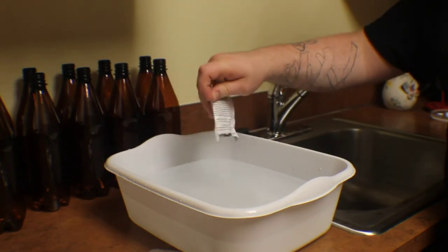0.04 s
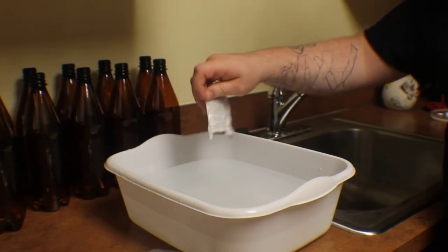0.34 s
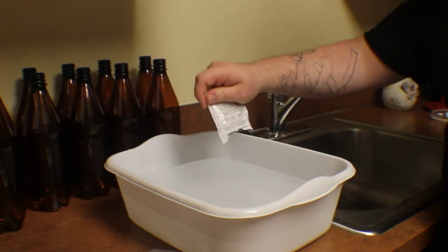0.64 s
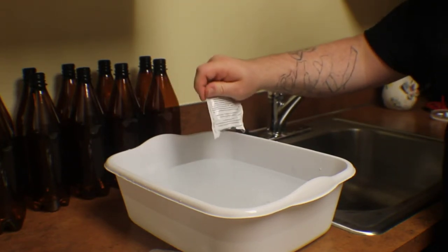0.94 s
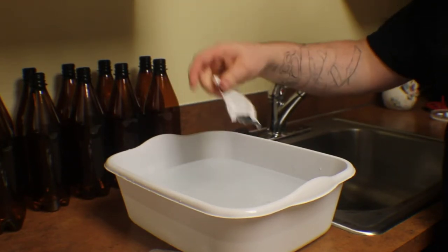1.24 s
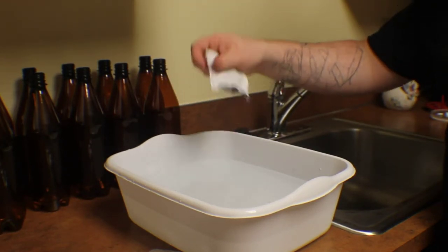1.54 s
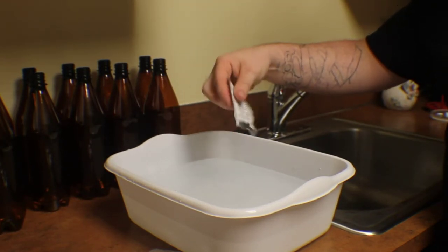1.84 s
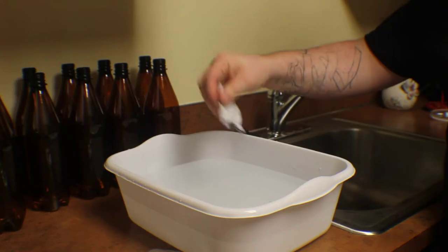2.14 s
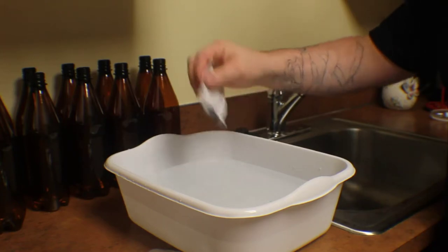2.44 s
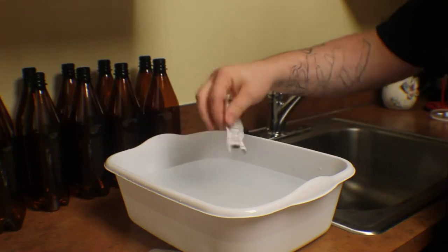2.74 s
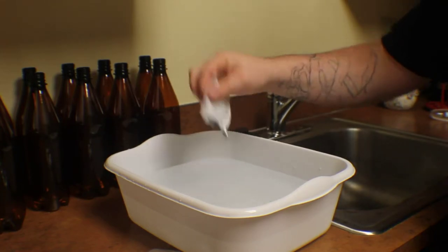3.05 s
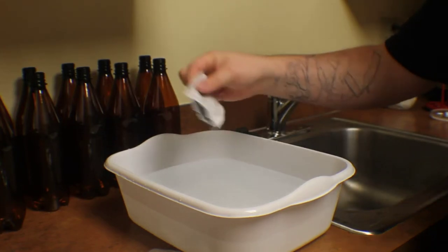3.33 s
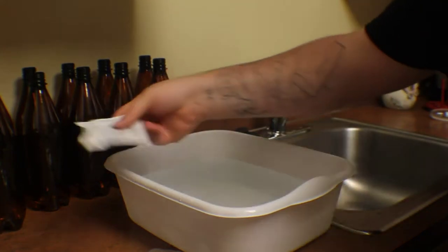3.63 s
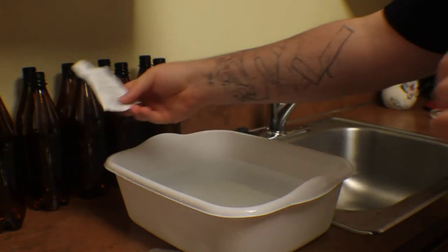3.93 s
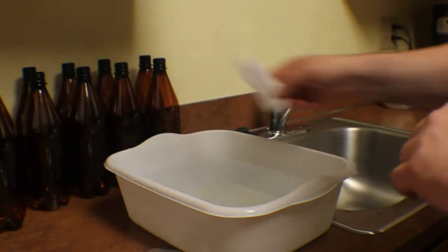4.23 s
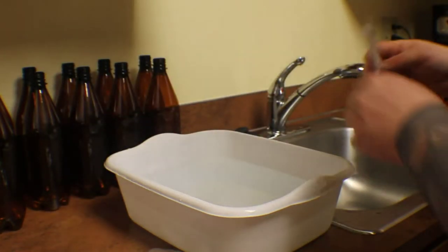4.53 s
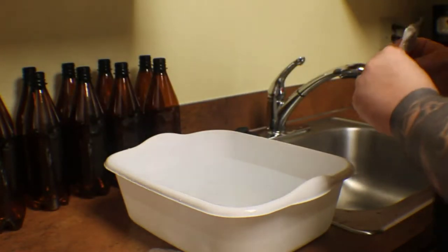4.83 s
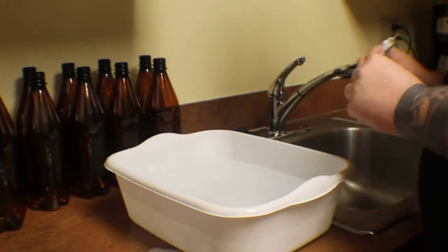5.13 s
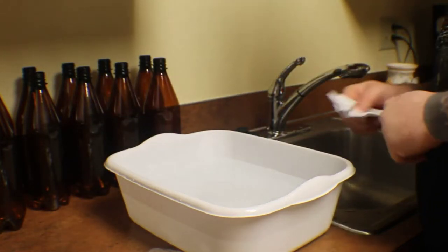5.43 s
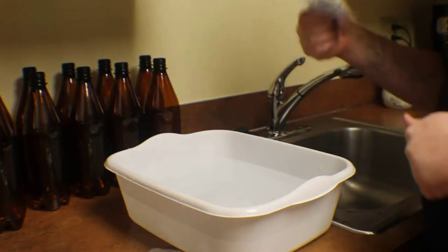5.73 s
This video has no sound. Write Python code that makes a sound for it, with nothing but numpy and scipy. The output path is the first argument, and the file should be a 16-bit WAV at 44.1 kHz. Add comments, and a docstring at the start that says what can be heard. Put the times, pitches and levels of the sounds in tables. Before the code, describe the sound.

A small paper packet snaps and rustles as it is shaken out, then gets crumpled in a small kitchen.

```python
"""At a kitchen sink, a small paper packet of powder is shaken empty over a plastic basin,
then carried off and crumpled. The paper buckles in sharp snaps, rubs softly between the
fingers and crunches when squeezed; a few soft knocks and hollow tones come with the handling.
The small, hard room answers each snap with an echo. Under it all lie a faint hiss and mains hum."""
import sys
import numpy as np
from scipy import signal
from scipy.fft import rfft, irfft
from scipy.io import wavfile

SR = 44100
rng = np.random.default_rng(int(sys.argv[2]) if len(sys.argv) > 2 else 0)


def log_audio(samples):
    """Write samples as a 16-bit WAV file to the path given in sys.argv[1]."""
    # one column per channel
    frames = np.atleast_2d(samples).T
    # limit to full scale, then quantise
    limited = np.clip(frames, -1, 1)
    pcm = np.round(limited * 32767).astype(np.int16)
    wavfile.write(sys.argv[1], SR, pcm)


N = 254744
TIME = np.arange(N) / SR

# Folds that snap: t/s, level/dB, lowest ringing f/Hz, top edge f/Hz, low flap within the snap/dB
PAPER_SNAPS = [(0.07, -38.5, 2680, 5300, 2.5), (0.08, -44.5, 2780, 8000, -3), (0.2815, -37, 1960, 6250, 5),
               (0.384, -53, 400, 6200, -6), (0.435, -41, 2400, 3320, -1), (0.455, -41, 394, 3040, 4.5),
               (0.53, -36.5, 1510, 3930, -2), (0.549, -35.5, 380, 5860, 4), (0.573, -25, 2530, 7800, -11.5),
               (0.642, -28.5, 1980, 5270, -3.5), (0.891, -52, 1190, 6600, -3),
               (0.901, -45.5, 1390, 8900, 5), (0.933, -52, 2600, 5500, -15),
               (0.946, -50.5, 5530, 10100, -12), (1.295, -51, 1700, 6900, -9),
               (1.328, -49.5, 366, 1580, -15), (1.5395, -27.5, 3570, 8700, -12.5),
               (1.632, -36, 1070, 2250, -0.5), (1.821, -48, 600, 8050, 5), (1.881, -38, 2240, 4350, -26),
               (1.903, -42.5, 1750, 3680, -6), (1.9596, -25.5, 2600, 8400, -7.5),
               (1.969, -33, 1260, 6430, -10), (1.9888, -33, 2130, 8700, -4.5), (2.01, -32, 1900, 8400, -14),
               (2.043, -36, 1570, 7000, -10), (2.094, -35.5, 1870, 10000, -2.5),
               (3.2634, -42.5, 1140, 1810, 0), (3.5596, -50.5, 728, 1400, 4), (4.124, -44.5, 367, 3920, -8),
               (4.131, -37, 1580, 2760, 2), (4.403, -49.5, 364, 1830, 3), (4.621, -50, 2640, 8900, -5),
               (4.651, -45, 500, 9500, 5), (4.666, -38.5, 1850, 8800, 9.5),
               (5.0664, -50.5, 3000, 13500, -9), (5.2897, -39, 2000, 7400, 6.5),
               (5.368, -36, 1500, 7100, -12), (5.526, -44.5, 1800, 5000, -21)]
# Squeezes of the crumpled packet: middle t/s, level/dB, half-length/s
PACKET_SQUEEZES = [(5.207, -56.5, 0.0092), (5.3044, -34, 0.0048), (5.342, -54, 0.041), (5.359, -43, 0.0064),
                   (5.426, -43.5, 0.0076)]
# Tone colour of crunching paper: f/Hz, level/dB
CRUNCH_SPECTRUM = [(150, -32), (400, -11), (900, -6), (1500, -8), (2200, 11), (3000, 3.5), (4500, -3),
                   (7300, 4.5), (10000, -6), (16000, -15)]
# Finger strokes over the packet: fastest moment t/s, rise time/s, rub level/dB, rustle level/dB
FINGER_STROKES = [(0.52, 0.016, -55, -55.5), (1.266, 0.01, -66, -53.5), (2.545, .024, -54.5, -73),
                  (2.59, 0.01, -69, -60.5), (2.863, .008, -70, -57.5), (2.985, 0.046, -58, -56.5),
                  (3.21, 0.032, -52.5, -58.5), (3.33, 0.042, -54, -76), (3.40, 0.034, -56.5, -57.5),
                  (3.55, 0.021, -61, -55), (3.79, 0.031, -62.5, -52), (3.90, 0.14, -66, -56.5),
                  (4.26, 0.061, -66, -61.5), (4.825, 0.018, -60.5, -59.5), (5.302, 0.03, -54.5, -43),
                  (5.375, 0.03, -54, -47.5), (5.425, .011, -50, -46.5), (5.69, 0.27, -70, -60)]
# Tone colour of skin rubbing on paper: f/Hz, level/dB
RUB_SPECTRUM = [(200, -13), (500, 2.5), (1000, 4.5), (1800, 1.5), (3000, -3), (6000, -14), (16000, -52)]
# Tone colour of paper sliding on paper: f/Hz, level/dB
RUSTLE_SPECTRUM = [(500, -59), (1500, -6), (3000, -6), (6000, -5), (8500, -5.5), (11000, -13.5),
                   (16000, -17)]
# Brief hollow tones as the packet is handled: t/s, f/Hz, level/dB, time to fade by 60 dB/s
HOLLOW_TONES = [(4.666, 530, -28.5, 0.045), (4.666, 1970, -28.5, 0.023), (5.414, 749, -37.5, 0.078),
                (5.418, 1514, -36, 0.095), (5.441, 643, -40, 0.12)]
# Soft knocks: t/s, thud f/Hz, level/dB, tick compared with the thud/dB
SOFT_KNOCKS = [(0.072, 149, -41.5, -30), (1.046, 238, -38, -41), (2.181, 262, -33.5, -3),
               (4.626, 143, -46, -30)]
# Strength of the kitchen's echo: f/Hz, level/dB
ECHO_SPECTRUM = [(150, -4.5), (400, -2.5), (640, -3.5), (1200, -7), (2100, -6.5), (3000, -8), (4300, -7.5),
                 (7000, -5), (10000, -4), (15000, -20)]
# Length of the kitchen's echo: f/Hz, time to fade by 60 dB/s
ECHO_FADE_TIMES = [(150, 0.38), (1000, 0.3), (4000, 0.34), (8000, 0.2), (15000, 0.16)]
# Tone colour of the faint hiss: f/Hz, level/dB
HISS_SPECTRUM = [(15, -42), (25, -26), (102, -8.5), (175, -2.5), (326, -1), (394, -1), (796, -5.5),
                 (863, -3.5), (962, -5), (1610, -5.5), (2000, -7.5), (6210, -12), (10700, -19),
                 (14800, -21.5), (16000, -23)]
# Tones of the mains hum: f/Hz, level/dB
MAINS_HUM = [(59.6, -82), (120, -80)]


def paper_snaps(flutter_s=0.0077, flutter_fall_db=4, settle_db=-13, settle_s=0.012,
                crack_size=6, full_force_db=-38, rise_s=0.0033, crisp_hz=7900):
    """A fold pops with a crack, the sheet flutters for a few milliseconds, then settles."""
    out, t = np.zeros(N), np.arange(SR // 16) / SR
    flutter = from_db(-flutter_fall_db * t / flutter_s)
    settle = from_db(settle_db) * np.exp((flutter_s - t) / settle_s)
    fade = np.where(t < flutter_s, flutter, settle)
    for s, level_db, ring_hz, top_hz, flap_db in PAPER_SNAPS:
        # a forceful fold starts with a full crack, a gentle one swells
        force = min(1, from_db((level_db - full_force_db) / 2))
        swell = 1 - (1 - force) * np.exp(-t / rise_s)
        push, sway, fibres = rng.standard_normal((3, len(t))) * fade * swell
        push[0] = fibres[0] = crack_size * force
        # a small stiff patch of paper sounds high, a large slack one low
        patch = cut(paper_patch(push, ring_hz), top_hz, "low", order=4)
        flap = from_db(flap_db) * band(sway, low_hz=380, high_hz=950)
        # crisper folds sizzle more: 12.5 dB for each octave the top edge rises
        sizzle_db = -6 + 12.5 * np.log2(top_hz / crisp_hz)
        sizzle = from_db(sizzle_db) * band(fibres, low_hz=2300, high_hz=8300, order=1)
        snap = patch + flap + sizzle
        strength = np.sqrt(np.sum(snap ** 2) / (flutter_s * SR))
        add(out, s, from_db(level_db) * snap / strength)
    return out


def paper_patch(push, hz, q=1.36):
    """A flat patch of paper rings at its lowest note and gives off little below; higher q rings longer."""
    angle = 2 * np.pi * hz / SR
    damping = np.sin(angle) / (2 * q)
    high_pass = (1 + np.cos(angle)) / 2 * np.array([1, -2, 1])
    feedback = [1 + damping, -2 * np.cos(angle), 1 - damping]
    return signal.lfilter(high_pass, feedback, push)


def squeezes():
    """Many small creases give way together under each squeeze."""
    force = sum(from_db(db) * np.exp(-((TIME - s) / half_s) ** 2 / 2)
                for s, db, half_s in PACKET_SQUEEZES)
    return force * coloured(fibre_clicks(per_s=4900, spread_db=3.0), CRUNCH_SPECTRUM)


def sliding_fingers():
    """Skin on paper gives a dull rub, paper on paper a brighter rustle; both grow with the hand's speed."""
    rub_power = rustle_power = 0
    for s, rise_s, rub_db, rustle_db in FINGER_STROKES:
        speed = stroke_speed(s, rise_s)
        rub_power += (from_db(rub_db) * speed) ** 2
        rustle_power += (from_db(rustle_db) * speed) ** 2
    rub = coloured(fibre_clicks(per_s=12000, spread_db=5.5), RUB_SPECTRUM)
    rustle = coloured(fibre_clicks(per_s=14000, spread_db=3.5), RUSTLE_SPECTRUM)
    return np.sqrt(rub_power) * rub + np.sqrt(rustle_power) * rustle


def stroke_speed(fastest_s, rise_s, slowdown_ratio=1.59):
    """A bell curve of height 1: the hand speeds up, then takes longer to slow down."""
    width_s = np.where(TIME < fastest_s, rise_s, rise_s * slowdown_ratio)
    return 1 / np.cosh(np.clip((TIME - fastest_s) / width_s, -20, 20))


def fibre_clicks(per_s, spread_db):
    """Paper fibres catch and let go: random clicks of uneven size."""
    sizes = from_db(spread_db * np.minimum(rng.exponential(1, N), 4))
    lets_go = rng.random(N) < per_s / SR
    return lets_go * sizes * rng.choice([-1, 1], N)


def hollow_tones(rise_s=0.0023):
    """Short hollow tones swell and die away."""
    out, t = np.zeros(N), np.arange(SR // 5) / SR
    swell = 1 - np.exp(-t / rise_s)
    for s, hz, level_db, fade_s in HOLLOW_TONES:
        add(out, s, from_db(level_db) * swell * ring(t, hz, fade_s))
    return out


def knocks():
    """Each padded blow makes a low thud, with a tick if the contact is hard."""
    out, t = np.zeros(N), np.arange(SR // 8) / SR
    for s, thud_hz, level_db, tick_db in SOFT_KNOCKS:
        thud = ring(t, thud_hz, fade_s=0.034)
        tick = from_db(tick_db) * ring(t, hz=1500, fade_s=0.015)
        add(out, s, from_db(level_db) * (thud + tick))
    return cut(out, hz=130, kind="high")   # a small body gives off little bass


def kitchen_echo(sound, first_echo_s=0.0046, build_s=0.00033):
    """Sound bounces off tiles, counter and basin; the highest tones die first."""
    t, echo = np.arange(SR // 2) / SR, 0
    onset = 1 - np.exp(-np.maximum(t - first_echo_s, 0) / build_s)
    edges_hz = np.geomspace(100, 18000, 19)
    for low, high in zip(edges_hz, edges_hz[1:]):
        middle_hz = np.sqrt(low * high)
        fade = onset * from_db(-60 * t / at_hz(ECHO_FADE_TIMES, middle_hz))
        tail = rms_one(band(rng.standard_normal(len(t)), low, high, order=3) * fade)
        band_share = np.sqrt(2 * (high - low) / SR / len(t))   # wider bands carry more energy
        echo += from_db(at_hz(ECHO_SPECTRUM, middle_hz)) * tail * band_share
    return signal.fftconvolve(sound, echo)[:N]


def hum_and_hiss(hiss_db=-58):
    """The mains supply hums in two low tones beside a steady hiss."""
    hum = sum(from_db(db) * np.sqrt(2) * np.sin(2 * np.pi * (hz * TIME + rng.random()))
              for hz, db in MAINS_HUM)
    hiss = from_db(hiss_db) * coloured(rng.standard_normal(N), HISS_SPECTRUM)
    return hum + hiss


def from_db(db):
    """Turn decibels into a number to multiply by."""
    return 10 ** (np.asarray(db) / 20)


def rms_one(x):
    """Scale a sound so its average strength (rms) is 1."""
    return x / np.sqrt(np.mean(x ** 2) + 1e-20)


def at_hz(table, hz):
    """Read between a table's rows, with octaves evenly spaced."""
    freqs, values = np.transpose(table)
    return np.interp(np.log(hz + 1e-9), np.log(freqs), values)


def coloured(x, spectrum):
    """Give a steady noise a tone colour, at strength 1."""
    gains = from_db(at_hz(spectrum, np.fft.rfftfreq(N, 1 / SR)))
    return rms_one(irfft(rfft(x) * gains, N))


def band(x, low_hz, high_hz, order=2):
    """Keep what lies between two frequencies."""
    edges = np.clip([low_hz, high_hz], [10, 20], [.4 * SR, .45 * SR])
    return signal.sosfilt(signal.butter(order, edges, "band", fs=SR, output="sos"), x)


def cut(x, hz, kind, order=2):
    """Keep the "low" or the "high" side of a frequency."""
    return signal.sosfilt(signal.butter(order, min(hz, .45 * SR), kind, fs=SR, output="sos"), x)


def ring(t, hz, fade_s):
    """A pure tone that fades by 60 dB in fade_s."""
    return np.sin(2 * np.pi * hz * t) * from_db(-60 * t / fade_s)


def add(out, s, sound):
    """Mix a sound in, starting at s seconds."""
    start = max(round(s * SR), 0)
    out[start:start + len(sound)] += sound[:N - start]


def scene(handling_echo_db=-5):
    """Mix the packet, its echo and the background, the same in both channels."""
    snaps = paper_snaps()
    handling = squeezes() + hollow_tones() + knocks()
    echo = kitchen_echo(snaps + from_db(handling_echo_db) * handling)
    mono = snaps + handling + echo + sliding_fingers() + hum_and_hiss()
    return np.array([mono, mono])


def record(dry, cutoff_hz=16000):
    """Cut off the very highest tones steeply."""
    return signal.sosfilt(signal.ellip(10, .1, 70, cutoff_hz, fs=SR, output="sos"), dry)


dry = scene()
out = record(dry)
log_audio(out)
```